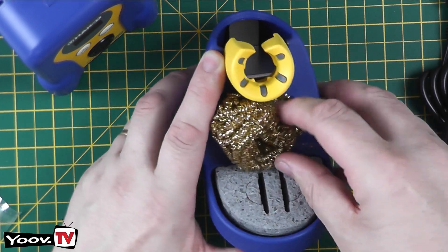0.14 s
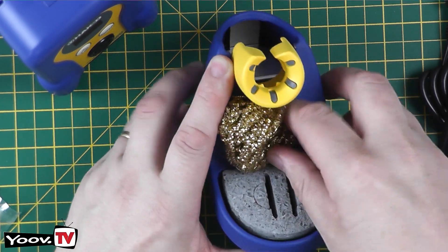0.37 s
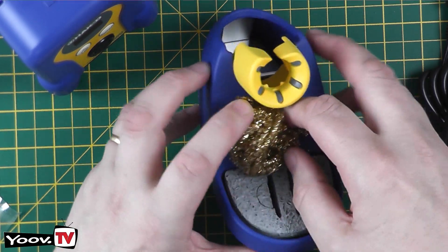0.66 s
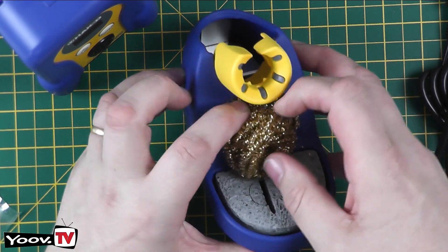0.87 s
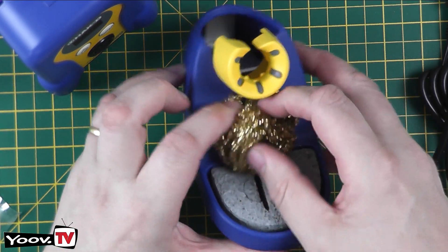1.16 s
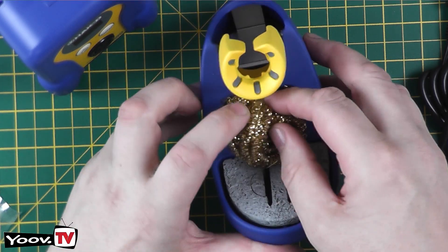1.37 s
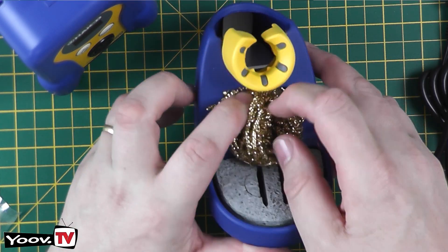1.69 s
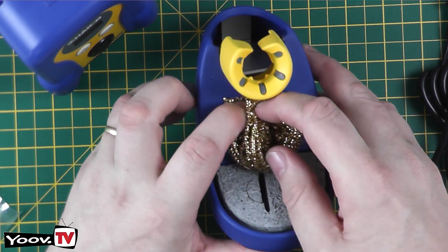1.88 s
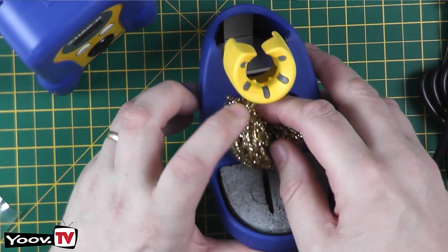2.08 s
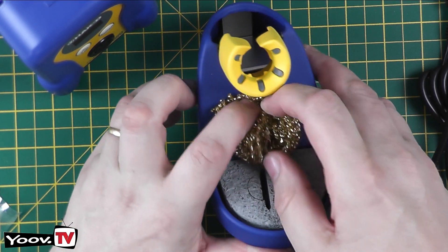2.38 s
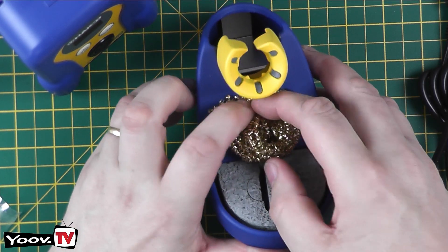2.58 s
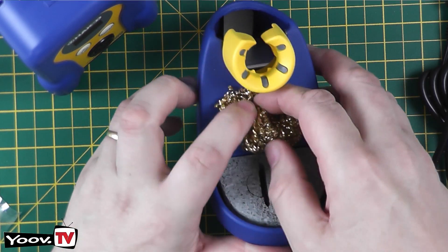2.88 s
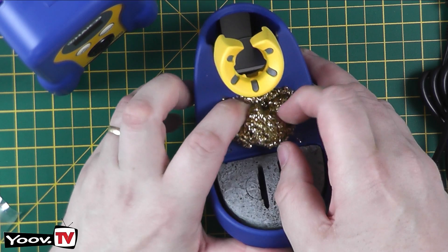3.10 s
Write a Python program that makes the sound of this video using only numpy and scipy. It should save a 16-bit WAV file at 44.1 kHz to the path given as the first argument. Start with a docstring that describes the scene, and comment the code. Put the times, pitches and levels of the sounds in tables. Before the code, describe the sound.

Scratchy, crackling wire wool squeezed into a plastic holder, with soft bumps and scrapes.

```python
"""A ball of brass wool, stuffed by fingers into a plastic holder on a workbench, heard close up.
Each squeeze sets off a shower of tiny wire slips that ring the curls and scratch the shell; single
strands snap free, tick and sing. Fingers bump and squeak on the holder, which judders over the mat
in a few shoves. A very low wobble swells and fades over a faint hum in a small, quiet room."""
import sys
import numpy as np
from scipy import signal
from scipy.fft import rfft, irfft
from scipy.io import wavfile
from scipy.ndimage import uniform_filter1d

SR = 44100
rng = np.random.default_rng(int(sys.argv[2]) if len(sys.argv) > 2 else 0)


def materialize(psi):
    """Save the field psi as 16-bit PCM at rate SR to the path in sys.argv[1].

    A 1-D psi becomes a single channel; in a 2-D psi each row is a channel.
    """
    bounded = np.clip(np.atleast_2d(psi).T, -1, 1)
    quanta = np.round(bounded * 32767).astype(np.int16)
    wavfile.write(sys.argv[1], SR, quanta)


N = 143325

# One list per squeeze. Each row: time in seconds, then rustle, scratch and sizzle in relative dB.
SQUEEZE_LEVELS = [
    [(0.0, -69, -72, -78), (0.045, -62.5, -60.5, -71), (0.09, -74, -71.5, -84), (0.196, -58, -66.5, -70),
     (0.31, -40.5, -46.5, -49.5), (0.49, -49.5, -53.5, -55), (0.56, -57, -63, -71)],
    [(0.58, -53, -62, -61), (0.652, -52.5, -61, -55), (0.712, -56.5, -67, -61.5), (0.828, -52, -54.5, -58),
     (0.916, -49.5, -50.5, -49.5), (0.96, -54, -59.5, -70)],
    [(1.0, -61, -59.5, -58), (1.048, -57.5, -64.5, -59.5), (1.078, -54, -56, -57), (1.094, -46, -49.5, -48),
     (1.174, -55, -57, -61.5), (1.2, -59, -62, -62)],
    [(1.215, -50.5, -55, -59), (1.24, -39, -42, -45.5), (1.3, -44.5, -40.5, -57), (1.325, -40, -44.5, -55),
     (1.35, -51, -41, -62), (1.382, -55, -56, -64), (1.506, -51.5, -57, -56.5), (1.53, -70, -71, -72)],
    [(1.55, -54, -63, -63), (1.564, -57, -55, -67), (1.586, -48.5, -52, -58.5), (1.714, -51.5, -53.5, -52),
     (1.82, -67.5, -63.5, -84), (1.885, -62.5, -69, -73)],
    [(1.9, -57, -57, -55), (1.916, -47, -44.5, -55), (1.99, -52.5, -58, -54.5), (2.07, -45, -51.5, -48),
     (2.105, -53.5, -55, -61), (2.21, -49, -57.5, -60), (2.237, -43.5, -47.5, -54), (2.33, -55.5, -63, -62)],
    [(2.35, -48.5, -56, -57), (2.375, -44.5, -52.5, -50.5), (2.45, -48.5, -51.5, -51),
     (2.51, -62.5, -65.5, -69), (2.54, -48, -49, -50.5), (2.62, -57, -60.5, -64)],
    [(2.64, -47.5, -56.5, -54.5), (2.726, -41, -45, -43), (2.764, -51, -52.5, -62), (2.804, -66, -64, -54),
     (2.83, -57.5, -72, -71), (2.86, -57.5, -59, -65)],
    [(2.9, -56.5, -56.5, -61), (2.934, -61, -61, -65), (2.948, -48, -57, -56), (3.034, -39.5, -45, -45),
     (3.1, -54.5, -51, -58), (3.12, -58, -54, -55)],
    [(3.145, -55, -60, -63), (3.179, -54, -55, -58), (3.2, -46, -51.5, -47), (3.217, -50.5, -53, -56),
     (3.25, -44.5, -50.5, -44.5)],
]
# Ringing of the wool in its cup and of the holder on the bench.
# Each row: frequency in Hz, width in Hz, lift in dB.
WOOL_RESONANCES = [(1766, 230, 6.5), (2087, 13, 9), (2277, 38, 9), (2733, 59, 11), (4110, 33, 13.5),
                   (4376, 51, 10.5), (5536, 77, 9), (6203, 33, 9), (6364, 30, 8.5), (7115, 60, 11.5),
                   (7760, 80, 11), (8140, 83, 7), (9320, 120, 11), (10810, 60, 13), (11550, 110, 8),
                   (12800, 70, 3)]
HOLDER_RESONANCES = [(169, 15.3, 7.5), (208, 19.5, 12.5), (277.7, 17, 7.5), (348.3, 38, 8), (427.5, 20, 6),
                     (473, 36, 8.5), (525, 13.4, 10), (660, 18.6, 13.5), (720, 37, 9.5), (807, 13, 2.5),
                     (832, 10, 13), (922, 25, 16.5), (1013, 23, 10)]
# Spectra of wire rustle, shell scratch, top sizzle and holder judder.
# Each row: frequency in Hz, relative level in dB.
RUSTLE_COLOUR = [(1800, -33.5), (3000, -16), (3800, -7), (4900, -5.5), (6000, -3), (7600, -1), (9600, -6.5),
                 (12000, -28.5)]
SCRATCH_COLOUR = [(300, -26), (700, -8), (1100, 5.5), (1800, 2), (2400, -1.5), (3200, -5.5), (4500, -20),
                  (9000, -71.5)]
SIZZLE_COLOUR = [(6000, -30.5), (8800, 5.5), (11000, 0), (12200, 4), (13500, 0.5), (15000, 2.5),
                 (16000, -7.5)]
JUDDER_COLOUR = [(60, -19.5), (130, -14), (200, 1.5), (350, -0.5), (500, -7.5), (580, -16.5), (900, -30),
                 (2500, -55.5)]


def wool(coil_rise_db_per_s=0.94):
    """Wires slip in clumps, ring and scratch the shell; the pushing rumbles in the holder."""
    # Strongest ring of the coiled wire. Each row: frequency in Hz, width in Hz, lift in dB.
    coil_resonances = [(3994, 79, 15), (4162, 55, 24.5)]
    # Spectra of that ring and of the rumble. Each row: frequency in Hz, relative level in dB.
    coil_colour = [(2800, -45), (4130, 5), (5400, -41)]
    rumble_colour = [(40, -15.5), (90, 7.5), (130, 3), (180, 0), (300, -8.5), (500, -13), (900, -34),
                     (3000, -32)]
    rows = np.concatenate(SQUEEZE_LEVELS)
    rustle_db, scratch_db, sizzle_db = curve(rows, 1), curve(rows, 2), curve(rows, 3)
    grains = unit(slips(per_s=9000, spread_db=3) * clumps())
    rustle = body(grains * undb(rustle_db - 1.5), RUSTLE_COLOUR, WOOL_RESONANCES)
    scratch = body(grains * undb(scratch_db - 0.5), SCRATCH_COLOUR, WOOL_RESONANCES)
    sizzle = body(grains * undb(sizzle_db - 1), SIZZLE_COLOUR, WOOL_RESONANCES)
    coil_db = rustle_db - 10 + coil_rise_db_per_s * np.arange(N) / SR  # louder as the ball packs tight
    coil = body(grains * undb(coil_db), coil_colour, coil_resonances)
    push = unit(undb(0.64 * scratch_db))  # follows the scratch over a narrower range
    rumble = body(push * rng.standard_normal(N), rumble_colour, HOLDER_RESONANCES)
    return rustle + scratch + sizzle + coil + undb(-48.5) * rumble


def slips(per_s, spread_db):
    """Random tiny impulses, most weak and a few strong; rms 1."""
    fires = rng.random(N) < per_s / SR
    size = np.minimum(rng.exponential(size=N), 5)
    sign = rng.choice([-1, 1], N)
    return unit(fires * sign * undb(spread_db * size))


def clumps(decay_s=0.0093, floor=0.66):
    """Envelope of slip avalanches: each starts at once and dies away."""
    starts = np.abs(slips(per_s=260, spread_db=3))
    avalanches = signal.lfilter([1], [1, -np.exp(-1 / (decay_s * SR))], starts)
    return unit(floor + unit(avalanches))


def snaps(chatter_decay_s=0.003, ping_decay_s=0.0057, crack_db=5):
    """A strand lets go with a crack, pings, and sets its neighbours chattering briefly."""
    # Each row: start in seconds, ring level in dB, shell knock in dB re ring, strand pitch in Hz,
    # ping in dB re ring.
    releases = [(0.2355, -46, -8, 7230, 2), (.9745, -38.5, -4.5, 10800, -2), (.979, -40.5, -6, 10800, 1),
                (1.0895, -42, -11, 10800, 1), (1.22, -43.5, -10, 4170, 7), (1.2393, -37, -9, 7100, -6),
                (1.828, -54.5, 7, 2220, -6), (1.9109, -41, 0, 4110, -2), (2.1147, -34.5, -9.5, 4220, -2),
                (2.366, -41.5, -11, 7040, -2), (2.4634, -41.5, -2, 4170, -5),
                (2.7184, -31.5, -7.5, 7260, 0), (2.7842, -39, -20, 7130, -3), (2.799, -41.5, -6.5, 7140, 1),
                (2.8746, -35, -14.5, 7100, -3.5), (2.968, -38.5, -9, 4000, 1.5),
                (3.129, -35, -14, 3970, -3), (3.222, -39, -2, 4130, -1)]
    ring, knock, ping = np.zeros((3, N))
    chatter = rng.standard_normal(N)
    for start_s, db, knock_db, hz, ping_db in releases:
        at, t = window(start_s, 10 * ping_decay_s)
        burst = chatter[at] * np.exp(-t / chatter_decay_s)
        burst[0] = undb(crack_db)
        ring[at] += undb(db) * burst
        knock[at] += undb(db + knock_db) * burst
        ping[at] += undb(db + ping_db) * np.sin(2 * np.pi * hz * t) * np.exp(-t / ping_decay_s)
    rustle = body(ring, RUSTLE_COLOUR, WOOL_RESONANCES)
    sizzle = undb(-7) * body(ring, SIZZLE_COLOUR, WOOL_RESONANCES)
    return ping + rustle + sizzle + body(knock, SCRATCH_COLOUR, WOOL_RESONANCES)


def curls(x, count=70, low_hz=4555, high_hz=14780, width_hz=123, ring_db=-7):
    """Adds the brief ring of many small curls driven by x, each at a random pitch."""
    t = np.arange(SR // 6) / SR
    ring = np.zeros(len(t))
    for k, (place, phase, size) in enumerate(rng.random((count, 3))):
        hz = low_hz + (high_hz - low_hz) * (k + place) / count
        ring += size * np.cos(2 * np.pi * (hz * t + phase))
    ring *= np.exp(-np.pi * width_hz * t)
    return x + undb(ring_db) * signal.fftconvolve(x, ring / np.linalg.norm(ring))[:N]


def plucks(per_s=82, low_hz=5210, high_hz=12960, decay_s=0.0033, click_db=11.5, spread_db=2):
    """Lone strands tick and ring at random moments; their level follows the squeeze."""
    out = np.zeros(N)
    rustle_db = curve(np.concatenate(SQUEEZE_LEVELS), 1)
    for when, place, weakness in rng.random((int(per_s * N / SR), 3)):
        at, t = window(when * N / SR, 10 * decay_s)
        hz = low_hz * (high_hz / low_hz) ** place
        tick = np.sin(2 * np.pi * hz * t) * np.exp(-t / decay_s) * low_hz / hz
        tick[0] += undb(click_db)
        db = rustle_db[at.start] - 4.5 - spread_db * np.log(weakness + 0.05)
        out[at] += undb(db) * tick
    return out


def strands():
    """Taut strands sing as they are dragged."""
    # Each row: start in seconds, length in seconds, pitch in Hz, level in dB.
    drags = [(.6, 0.081, 6320, -55), (1.255, 0.09, 2740, -45), (1.308, 0.05, 6370, -41.5),
             (1.312, 0.049, 8450, -47.5), (1.33, .032, 4140, -43.5), (2.36, 0.065, 2085, -55),
             (2.715, 0.092, 2055, -61), (3.185, .065, 10850, -60)]
    return friction_tones(drags, width_hz=70)


def flick(start_s=3.1298):
    """A wire end strikes the rim: a hard, dry click."""
    # Each row: frequency in Hz, relative level in dB, decay in seconds.
    rim_modes = [(2370, -12, .004), (3220, -6.5, 0.0026), (3900, 2, 0.0021)]
    out = np.zeros(N)
    at, t = window(start_s, 0.05)
    for hz, db, decay_s in rim_modes:
        out[at] += undb(db - 30) * np.sin(2 * np.pi * hz * t) * np.exp(-t / decay_s)
    return out


def holder():
    """The feet stick and slip on the mat during each shove, ringing the holder and the bench."""
    # One list per shove. Each row: time in seconds, then judder and rasp in relative dB.
    shoves = [
        [(0.22, -48, -81), (0.238, -55, -65.5), (0.474, -50.5, -62), (0.516, -39, -49), (0.576, -53.5, -70),
         (0.61, -75, -86)],
        [(0.63, -89, -74), (0.662, -46, -64), (0.72, -58.5, -66), (0.794, -41, -54), (0.824, -31.5, -44.5),
         (0.91, -39, -48.5), (0.97, -54, -63)],
        [(1.06, -71, -70), (1.078, -60, -62), (1.1, -71, -46.5), (1.128, -67, -92), (1.14, -63, -56),
         (1.19, -74, -80)],
        [(1.205, -64, -66), (1.223, -31.5, -47), (1.243, -28.5, -37), (1.283, -33.5, -33), (1.321, -29, -41),
         (1.4, -54, -57)],
        [(1.555, -62, -63), (1.563, -53, -53), (1.581, -35.5, -47.5), (1.613, -35, -44.5), (1.657, -35, -49.5),
         (1.675, -38, -57)],
        [(1.675, -38, -54), (1.721, -31, -45), (1.787, -58, -82), (1.809, -40, -66), (1.833, -54, -56),
         (1.86, -58, -82)],
    ]
    # Each row: frequency in Hz, relative level in dB.
    rasp_colour = [(250, -24.5), (570, -7), (650, 4), (950, 3), (1200, 6), (1600, 2), (3000, -31),
                   (8000, -60)]
    t = np.arange(N) / SR
    judder_gain, rasp_gain = np.zeros((2, N))
    for rows in shoves:
        moving = (t > rows[0][0]) & (t < rows[-1][0])
        gate = uniform_filter1d(moving.astype(float), size=400)
        judder_gain += gate * undb(curve(rows, 1) + 1)
        rasp_gain += gate * undb(curve(rows, 2) + 0.5)
    jerks = slips(per_s=700, spread_db=1.9)
    jerks /= np.sqrt(uniform_filter1d(jerks ** 2, size=1200) + 0.01)  # evens out short-term power
    judder = body(jerks * judder_gain, JUDDER_COLOUR, HOLDER_RESONANCES)
    rasp = body(jerks * rasp_gain, rasp_colour, HOLDER_RESONANCES)
    return judder + rasp


def bumps(rise_s=0.0006, decay_s=0.019):
    """Soft fingertips thud on the holder and scuff it."""
    # Each row: start in seconds, relative level in dB, thud pitch in Hz.
    touches = [(.104, -50, 138), (0.344, -44.5, 288), (0.459, -42, 112), (0.534, -39.5, 116),
               (0.813, -34, 199), (0.982, -38.5, 111), (1.085, -40, 110), (1.126, -45, 131),
               (2.066, -42.5, 219), (2.109, -41.5, 185), (2.448, -45.5, 107), (2.7, -45, 333),
               (3.04, -42.5, 207), (3.201, -44.5, 116)]
    thud, scuff_gain = np.zeros((2, N))
    for start_s, db, hz in touches:
        at, t = window(start_s, 10 * decay_s)
        push = undb(db) * (1 - np.exp(-t / rise_s)) * np.exp(-t / decay_s)
        thud[at] += 2 * push * np.sin(2 * np.pi * hz * t)
        scuff_gain[at] += push
    scuff = body(scuff_gain * rng.standard_normal(N), JUDDER_COLOUR, HOLDER_RESONANCES)
    return thud + undb(-3.5) * scuff


def squeaks():
    """Fingers rub and squeak on the plastic."""
    # Each row: start in seconds, length in seconds, pitch in Hz, level in dB.
    rubs = [(.135, 0.026, 1980, -59), (1.78, 0.027, 1307, -53), (1.822, .018, 963, -53),
            (1.905, 0.062, 1780, -49)]
    return friction_tones(rubs, width_hz=240)


def low_wobble():
    """A very low, wavering wobble near 27 Hz swells and fades."""
    # Each row: time in seconds, relative level in dB.
    wobble_levels = [(0.0, -47.5), (0.46, -34), (0.6, -45.5), (0.89, -33), (1.04, -46), (1.22, -26),
                     (1.49, -44), (1.78, -28.5), (1.91, -34.5), (1.98, -25), (2.36, -40), (2.82, -26.5),
                     (3.25, -45.5)]
    return undb(curve(wobble_levels, 1) - 1.5) * wavering_tone(hz=26.64, wander=0.084, turns_per_s=14)


def room(x, t60_s=0.085, gap_s=0.003, tail_db=-9.5):
    """Adds a short, soft tail from the nearby walls."""
    t = np.arange(SR // 2) / SR
    tail = rng.standard_normal(len(t)) * np.exp(-np.log(1000) * t / t60_s) * (t > gap_s)
    return x + undb(tail_db) * signal.fftconvolve(x, tail / np.linalg.norm(tail))[:N]


def background(hum_db=-54.5, hum_spread_db=2, air_db=-51.5):
    """A wavering hum and the air of the room."""
    # Each row: frequency in Hz, relative level in dB.
    air_colour = [(24, -46), (40, -12.5), (103, 5.5), (173, -21.5), (313, -19), (659, -28.5), (2280, -29.5),
                  (3740, -36), (15000, -43.5)]
    hum_gain = undb(hum_db + hum_spread_db * drift(turns_per_s=9))
    hum = hum_gain * wavering_tone(hz=91, wander=0.061, turns_per_s=17)
    return hum + undb(air_db) * body(rng.standard_normal(N), air_colour)


def friction_tones(rows, width_hz):
    """Brief, rough tones: narrow noise bands that swell and fade."""
    out = np.zeros(N)
    in_phase, quadrature = drift(2 * width_hz), drift(2 * width_hz)
    for start_s, length_s, hz, db in rows:
        at, t = window(start_s, length_s)
        phase = 2 * np.pi * hz * t
        band = in_phase[at] * np.sin(phase) + quadrature[at] * np.cos(phase)
        out[at] += undb(db) * np.sin(np.pi * t / length_s) * band
    return out


def wavering_tone(hz, wander, turns_per_s):
    """Sine of rms 1; its pitch drifts by the rms fraction wander."""
    pitch_hz = hz * (1 + wander * drift(turns_per_s))
    return np.sqrt(2) * np.sin(2 * np.pi * np.cumsum(pitch_hz) / SR)


def body(x, colour, resonances=(), size=16384):
    """Causal filter of unit power: a broad colour with resonances on top."""
    f = np.arange(size // 2 + 1) * SR / size
    colour = np.array(colour)
    db = np.interp(np.log(f + 1), np.log(colour[:, 0]), colour[:, 1])
    for hz, width_hz, lift_db in resonances:
        db += 10 * np.log10(1 + (undb(lift_db) ** 2 - 1) / (1 + (2 * (f - hz) / width_hz) ** 2))
    cepstrum = irfft(np.log(unit(undb(db))))
    cepstrum[1:size // 2] *= 2  # fold to minimum phase
    cepstrum[size // 2 + 1:] = 0
    response = irfft(np.exp(rfft(cepstrum)))[:size // 2]
    return signal.oaconvolve(x, response)[:N]


def drift(turns_per_s, count=8192):
    """Random values joined by straight lines; rms 1."""
    return unit(np.interp(np.arange(N) * turns_per_s / SR, np.arange(count), rng.standard_normal(count)))


def curve(rows, col):
    """One table column, interpolated linearly in time."""
    rows = np.array(rows)
    return np.interp(np.arange(N) / SR, rows[:, 0], rows[:, col])


def window(start_s, length_s):
    """Sample slice of one event and seconds since its start."""
    start = int(start_s * SR)
    stop = min(start + int(length_s * SR), N)
    return slice(start, stop), np.arange(stop - start) / SR


def undb(db):
    """Decibels to gain."""
    return 10 ** (np.asarray(db) / 20)


def unit(x):
    """Scale to rms 1."""
    return x / np.sqrt(np.mean(x ** 2))


def scene():
    """Brass and plastic in the room, over a low wobble, hum and air; mono."""
    brass = curls(wool() + snaps()) + plucks() + strands()
    plastic = holder() + bumps() + flick() + squeaks()
    return (room(brass + plastic) + low_wobble() + background())[None]


def record(dry, top_hz=15850):
    """A steep low-pass cuts the top."""
    return signal.sosfilt(signal.ellip(10, 0.2, 80, top_hz, fs=SR, output="sos"), dry)


dry = scene()
out = record(dry)
materialize(out)
```